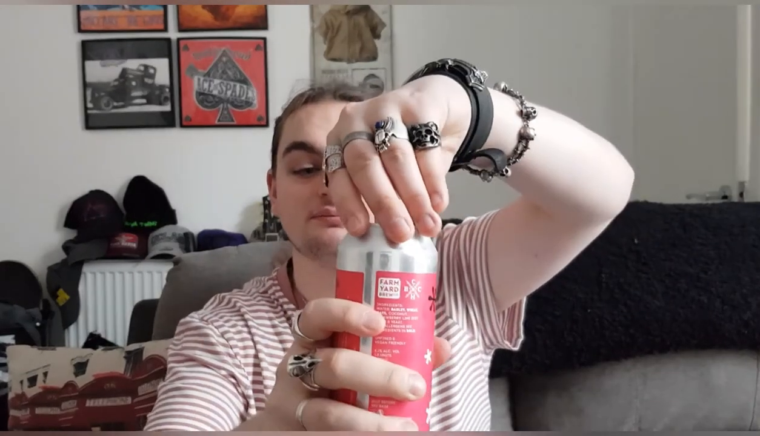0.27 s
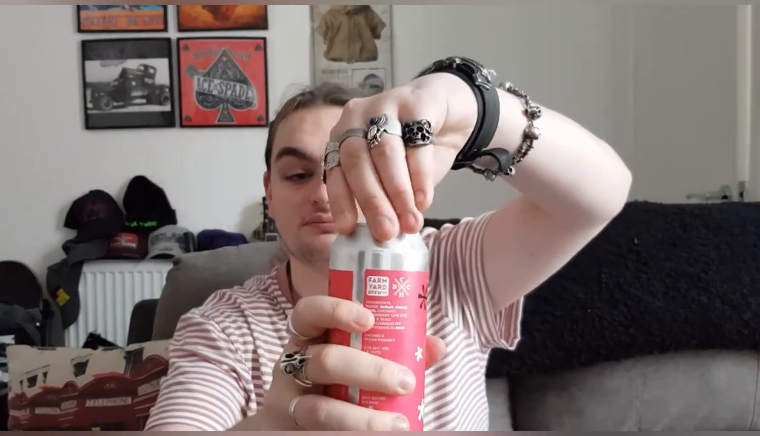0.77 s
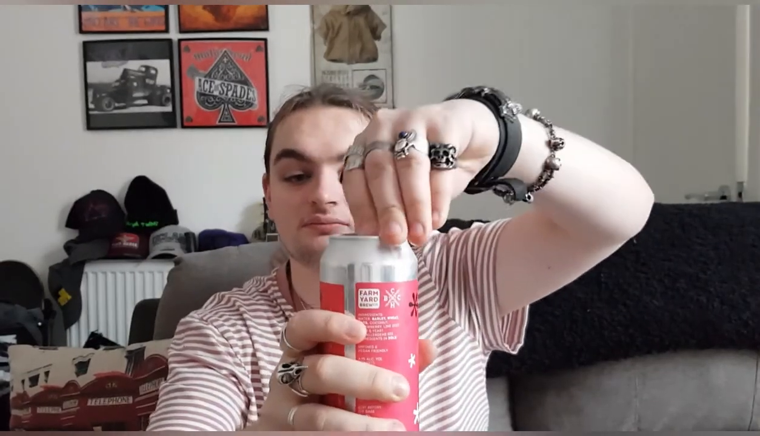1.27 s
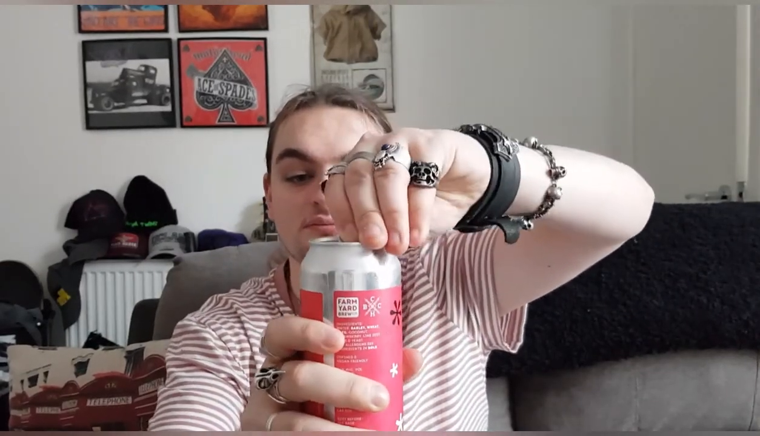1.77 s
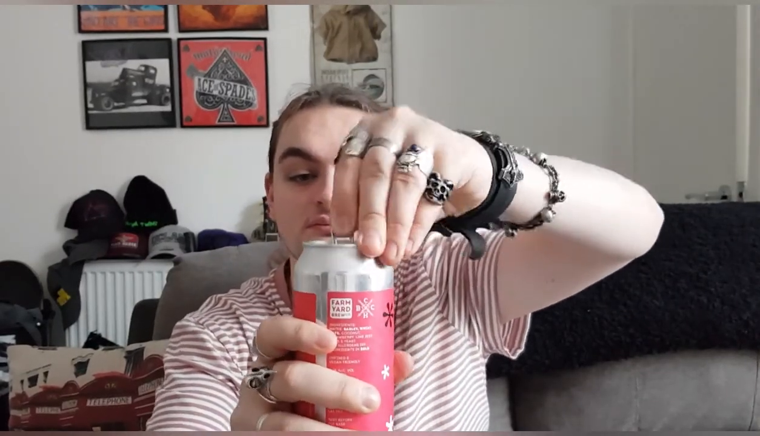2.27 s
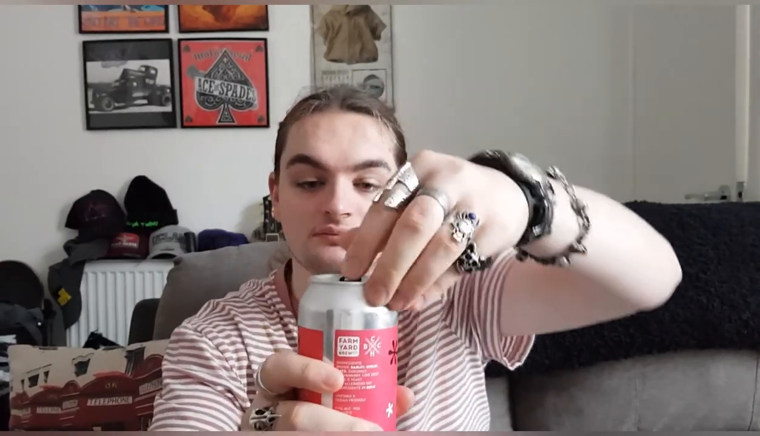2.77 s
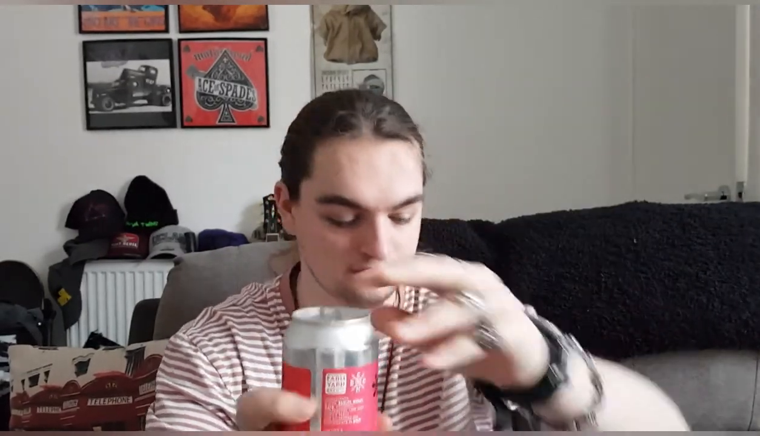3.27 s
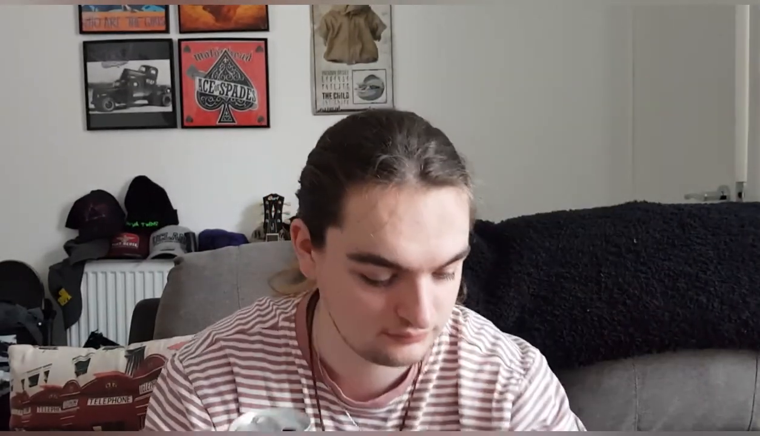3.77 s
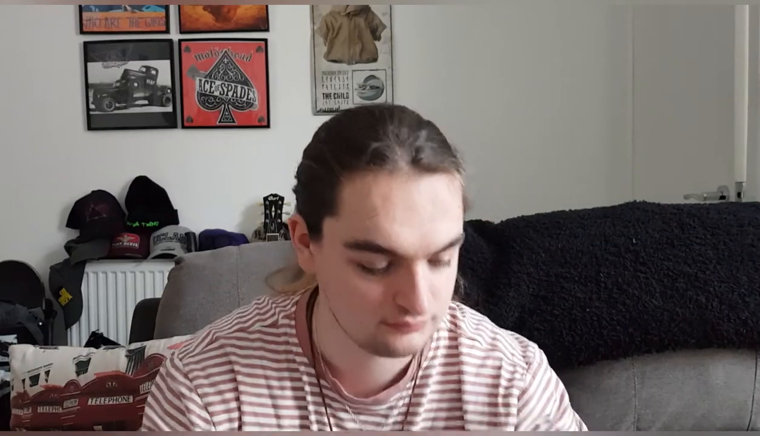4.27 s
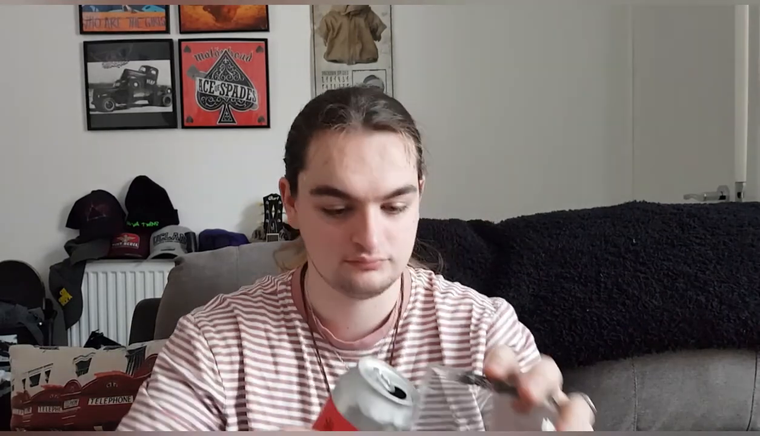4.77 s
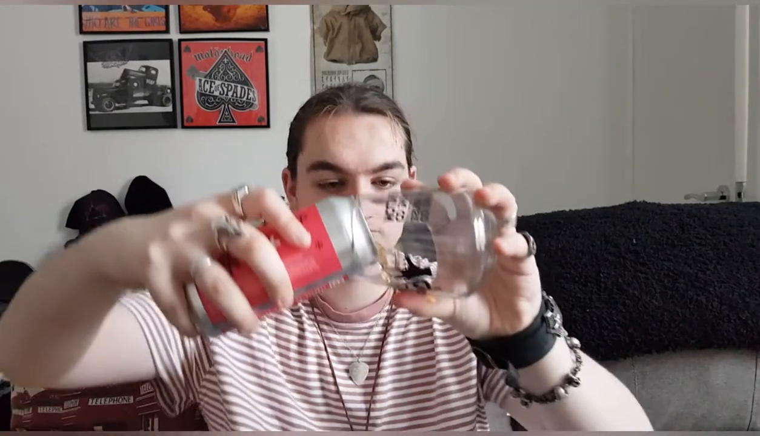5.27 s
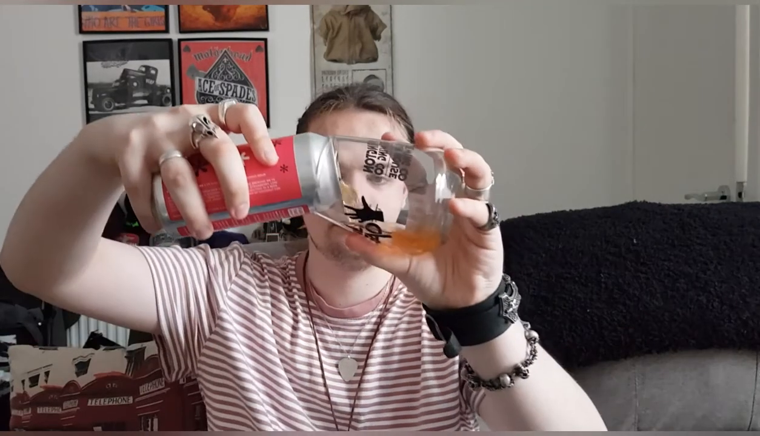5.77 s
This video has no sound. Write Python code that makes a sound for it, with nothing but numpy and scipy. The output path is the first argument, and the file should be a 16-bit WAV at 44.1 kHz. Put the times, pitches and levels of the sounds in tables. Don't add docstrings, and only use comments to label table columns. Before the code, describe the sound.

Close up in a small furnished room, a can seal snaps very loudly with a short puff of gas. Light tab ticks follow, then a rapid metallic tear and pop with a softer hiss. Fingers tick the tab and finger rings chink on metal. After a quieter gap, a can knocks a glass brightly and beer glugs softly. Faint motor hum and clock ticks sit beneath, in phone-style stereo.

```python
import sys
import numpy as np
from scipy import signal
from scipy.fft import rfft, irfft
from scipy.io import wavfile
from scipy.ndimage import uniform_filter1d

SR = 44100
rng = np.random.default_rng(int(sys.argv[2]) if len(sys.argv) > 2 else 0)


def dump(signal):
    limited = np.clip(np.atleast_2d(signal).T, -1, 1)
    pcm = np.round(limited * 32767).astype(np.int16)
    wavfile.write(sys.argv[1], SR, pcm)


def volts_from_decibels(level):
    exponent = np.asarray(level, float) / 20
    return 10 ** exponent


N = 264644
t = np.arange(N) / SR

# freq_hz, level_db (per Hz)
METAL_COLOUR = [(200, -58), (500, -45), (900, -32.5), (1340, -26), (1900, -9), (2600, -6), (3500, 0.5),
                (4400, -2), (5700, 0), (6800, -11), (8600, -19.5), (11100, -12), (15500, -27)]


def unit(x):
    return x / np.sqrt(np.mean(x ** 2))


def decay(u, t60_s):
    return np.exp(-np.log(1000) * u / t60_s)


def on_hz(points, size):
    freq_hz, value = np.transpose(points)
    bins_hz = np.arange(size // 2 + 1) * SR / size
    return np.interp(np.log(bins_hz + 1), np.log(freq_hz), value)


def noise(points, channels=1):
    white = rng.standard_normal((channels, N))
    return unit(irfft(rfft(white) * volts_from_decibels(on_hz(points, size=N)), N))


def walk(rate_hz):
    k = int(SR / rate_hz)
    return unit(uniform_filter1d(uniform_filter1d(rng.standard_normal(N), k), k))


def swells(rows, rise_s, fall_s):
    return sum(volts_from_decibels(db) * np.exp(np.minimum((t - s) / rise_s, (s - t) / fall_s)) for s, db in rows)


def click(points, tilt_db):
    tilt = [(hz, tilt_db * np.log2(hz / 3000)) for hz in (100, 20000)]
    ceps = irfft(np.log(volts_from_decibels(on_hz(points, size=1024) + on_hz(tilt, size=1024))))
    ceps[1:512] *= 2
    ceps[513:] = 0
    h = irfft(np.exp(rfft(ceps)))
    return h / np.abs(h).max()


def burst(seconds):
    b = np.eye(1, 256)[0]
    for share in rng.uniform(.25, 1, 3):
        loop = np.zeros(2 + int(share * seconds * SR))
        loop[[0, -1]] = 1, .55
        b = signal.lfilter(loop[::-1], loop, b)
    return b


def ring(modes, tilt_db=0., rise=3.02, size=SR // 3):
    u = t[:size]
    out = 0
    for hz, db, t60_s in modes:
        level = volts_from_decibels(db + tilt_db * np.log2(hz / 1000))
        push = np.sin(np.pi / 2 * np.minimum(u * hz / rise, 1)) ** 2
        out = out + level * np.sin(2 * np.pi * hz * u) * decay(u, t60_s) * push
    return out


def add(out, s, db, pan_db, sound):
    i = int(s * SR)
    n = min(len(sound), N - i)
    out[:, i:i + n] += volts_from_decibels(db + np.array([[pan_db], [-pan_db]]) / 2) * sound[:n]


def air():
    # freq_hz, level_db (per Hz)
    air_colour = [(150, -35), (250, -15), (323, -13), (450, -11.5), (560, -17.5), (700, -11.5),
                  (800, -17.5), (1150, -19), (1400, -20.5), (3200, -26), (4500, -22), (5800, -28),
                  (7500, -34), (10000, -59.5)]
    # freq_hz, level_db
    air_width = [(250, -7.5), (640, 2.5), (1400, 0.63)]
    mid, side = noise(air_colour, channels=2)
    side = irfft(rfft(side) * volts_from_decibels(on_hz(air_width, size=N)), N)
    return (mid + side * np.array([[1], [-1]])) * volts_from_decibels(-80 + 1.8 * walk(3))


def hum():
    overtones = [2, 3, 4, 5, 6, 7, 8, 9, 12, 14, 15, 16, 24.95]
    overtone_db = [-92.5, -89.5, -83.5, -83, -94.5, -80.5, -91, -89, -86, -84.5, -92.5, -89.5, -87.5]
    phase = 2 * np.pi * np.cumsum(45.6 * (1 + .0015 * walk(2))) / SR
    lull_db = -15 * np.exp(-((t - 3.666) / 0.15) ** 2)
    base_db = -69.5 + 0.12 * (t - t.mean()) + .6 * walk(1.6) + lull_db
    out = volts_from_decibels(base_db + np.array([[6.], [-3.]]) + 1.5 * walk(9)) * np.sin(phase)
    for k, db in zip(overtones, overtone_db):
        offset = rng.uniform(0, 2 * np.pi) + rng.normal(0, 0.8, (2, 1))
        out = out + volts_from_decibels(db + 2 + 1.5 * walk(8.7)) * np.sin(k * phase + offset)
    return out


def clock():
    out = np.zeros((2, N))
    first_s, period_s, lag_s, step_db = .26, 1.0, .022, -78
    u = t[:4000]
    step = noise([(2500, -1.5), (3500, -6), (4500, 3), (5200, 3.0), (6300, -3.5), (7500, -55)])[0]
    land = noise([(800, -44), (1300, 12.0), (1900, -5.0), (2500, -31.0), (3500, -9.5), (5000, -27.5)])[0]
    for k, s in enumerate(first_s + period_s * np.arange(6)):
        part = slice(k * len(u), (k + 1) * len(u))
        add(out, s, step_db, 0, step[part] * (u / .025) * np.exp(1 - u / .025))
        add(out, s + lag_s, step_db + 10, 0, land[part] * np.exp(-u / 0.004))
    return out


def rumble():
    mid, side = noise([(45, -30.0), (70, 2.5), (110, -4.5), (160, -6), (230, -6.0), (300, -17.0),
                       (500, -48), (1000, -95.5)], channels=2)
    return (mid + 0.34 * side * np.array([[1], [-1]])) * volts_from_decibels(0.83 * walk(20))


def sofa():
    # peak_s, level_db
    shifts = [(.3, -78), (2.6, -78), (3.25, -81.5), (4.05, -76.5), (4.85, -71)]
    return rumble() * (volts_from_decibels(-83 + 5.5 * walk(3)) + swells(shifts, rise_s=.2, fall_s=.2))


def thumps():
    # start_s, level_db
    jolts = [
        (.6, -65.5),
        (1.914, -57.5),
        (4.844, -56),
    ]
    out = np.zeros((2, N))
    for s, db in jolts:
        add(out, s, db, 0, ring([(90, -0.5, .15), (135, -2, 0.25), (227, -1, 0.12)], rise=0.88))
    return out


def pouring():
    # peak_s, level_db
    lurches = [(5.18, -67), (5.33, -78), (5.41, -64.5), (5.53, -63.5), (5.685, -54.5), (5.74, -60),
               (5.845, -68.5), (5.916, -57.5), (5.97, -63)]
    # peak_s, level_db
    gulps = [(5.18, -69), (5.41, -71), (5.46, -74), (5.55, -73), (5.702, -54.5), (5.787, -74), (5.842, -62),
             (5.892, -64), (5.948, -65)]
    glug = noise([(200, -61.5), (320, 2.5), (355, -17.5), (405, 3.5), (460, -16), (900, -77.5)])
    slosh = rumble() * swells(lurches, rise_s=0.016, fall_s=0.044)
    return slosh + glug * swells(gulps, rise_s=0.015, fall_s=0.031)


def glass():
    # start_s, peak_db, hardness_db (per octave), thud_db, shell_db
    knocks = [
        (3.858, -68.5, 12, -1, 10),
        (4.831, -22.5, -1.56, -1.5, 0.5),
        (4.8448, -36, 4, 2, 13),
        (4.8635, -25, 2, 10, 0.5),
        (4.8757, -40.5, -17, 11, -20.5),
    ]
    # pitch_hz, level_db, t60_s
    glass_modes = [(1450, -2, 0.035), (2190, -2, 0.0424), (2800, 5.5, 0.11), (3030, 3, 0.031),
                   (3500, -15, 0.053), (5120, 0.5, 0.06), (5350, -14, 0.022), (7430, -12.5, 0.038),
                   (9620, -8.5, 0.018), (13200, -15, 0.023)]
    # pitch_hz, level_db, t60_s
    can_wall = [(474, -4, 0.17), (510.4, -4.5, 0.14), (527, 2, 0.05), (1128, 1.5, 0.037)]
    # freq_hz, level_db (per Hz)
    thud_colour = [(150, -28), (300, 1), (490, -2), (1000, 3), (1600, 8), (2800, 3), (3900, 0.5),
                   (5100, -15), (6200, -3.5), (8500, -20), (11500, -7.5), (15500, -14)]
    # peak_s, level_db
    drags = [(4.678, -66), (4.727, -67)]
    out = np.zeros((2, N))
    for s, db, hard_db, thud_db, shell_db in knocks:
        modes = [(hz * rng.normal(1, .004), v, t60) for hz, v, t60 in glass_modes]
        twins = [(hz * rng.normal(1, 0.016), v, t60 / 2) for hz, v, t60 in glass_modes]
        sound = 0.096 * ring(modes, hard_db) + 0.22 * volts_from_decibels(1) * ring(twins, hard_db)
        sound += 0.36 * volts_from_decibels(shell_db) * ring(can_wall)
        thud = np.convolve(click(thud_colour, -2.5), burst(.0008))
        sound[:len(thud)] += volts_from_decibels(thud_db) * thud
        add(out, s, db, -0.5, sound)
    grit = noise([(250, -24.5), (600, 1), (1100, -6.5), (2200, -18.5), (3500, -26.5), (6500, -20), (8000, -31)])
    return out + grit * volts_from_decibels(2 * walk(80)) * swells(drags, rise_s=0.0117, fall_s=0.045)


def tick(out, s, db, pan_db, modes, crack_db):
    lid = [(1500 * 5.0 ** a, -5.5 - 12 * b - 4 * a, 0.0083) for a, b in rng.random((24, 2))]
    crack = ring(lid, size=4096)
    crack[:1024] += click(METAL_COLOUR, -.8)
    crowd = []
    for hz, v, t60 in modes:
        for a, b in rng.random((3, 2)):
            crowd.append((hz * (1 + 0.052 * (a - .5)), v - 5 * b - 5, t60))
    add(out, s, db, pan_db, ring(crowd, size=4096) + volts_from_decibels(crack_db) * crack)


def finger_rings():
    # start_s, peak_db, pan_db (left minus right), pitch_hz, t60_s
    chinks = [(1, -57, -5, 3280, 0.018), (1, -60, 8, 6060, .012), (1.4632, -29, 5, 4760, 0.0064),
              (1.4635, -41, 0.5, 1060, 0.0064), (2.242, -59, 5, 6600, 0.011),
              (2.241, -49, 1.5, 3750, 0.021), (2.901, -45, 5, 6200, 0.021), (2.901, -50, 3, 7240, .015),
              (2.286, -63, 2, 5350, 0.025), (2.344, -54, 0, 1670, 0.027), (2.346, -59, 8, 5350, .04),
              (3.088, -28, -3, 1106, 0.0072), (3.195, -54.5, -3.5, 1966, .011),
              (3.70, -64.5, -5.5, 3500, 0.0089), (3.858, -48, 4, 5270, .03), (3.862, -45, -8, 5170, 0.031),
              (3.886, -49, 0, 5350, 0.012), (3.946, -56.5, 0, 5720, 0.0051),
              (5.683, -59.5, -1, 2000, 0.038), (5.684, -56, 0, 3100, 0.017), (5.685, -58.5, 0, 3620, 0.039),
              (5.682, -55.5, 0, 4600, 0.0087), (5.855, -61, 7, 6760, 0.007), (5.881, -66, -1, 3020, 0.018)]
    out = np.zeros((2, N))
    for s, db, pan_db, hz, t60 in chinks:
        tick(out, s, db, pan_db, [(hz, 0, t60)], crack_db=-11)
    return out


def tab_taps():
    # start_s, peak_db, pan_db (left minus right), pitch_hz (lowest ring), crack_db (over the ring)
    taps = [(0.845, -59.5, -1, 1310, -16), (.913, -57.5, 5, 1337, -3), (2.241, -59, 0, 1000, -15),
            (2.327, -54.5, 0, 990, -23), (2.3432, -46, 2.1, 1004, -3), (2.449, -56.5, 2, 1010, -3),
            (2.6145, -28, 2, 1086, -25), (2.697, -51.5, -8.5, 1020, -13.5), (2.895, -57.5, 1.1, 1204, 4),
            (2.901, -37.5, 2.5, 1112, 6), (3.46, -64.5, 0.4, 1143, -19.5), (3.729, -62.5, -1.5, 1110, -20),
            (3.856, -49.5, -6, 1137, -35), (3.946, -65.5, -1.5, 1250, 14.5)]
    # multiple of the lowest ring, level_db, t60_s
    tab_modes = [(1, 2, .024), (1.45, -8.5, .008), (1.8, -10, .016), (2.549, -15.5, 0.048),
                 (4.6, -38, 0.013), (5.45, -26, 0.024)]
    out = np.zeros((2, N))
    for s, db, pan_db, hz, crack_db in taps:
        bright_db = 0.29 * crack_db
        modes = [(k * hz, v + bright_db * np.log2(k), t60) for k, v, t60 in tab_modes]
        tick(out, s, db, pan_db, modes, crack_db)
    return out


def gas():
    out = np.zeros((2, N))
    hiss = noise(METAL_COLOUR)[0] * volts_from_decibels(walk(60))
    for s, db in [(.5985, -33.5), (1.9185, -40.5)]:
        add(out, s, db, 0, hiss[:SR] * decay(t[:SR], 0.42))
    return out


def seal():
    # start_s, peak_db, pan_db (left minus right), tilt_db (per octave), treble_db
    snaps = [(0.5973, -1.5, -3, -2.5, 2.5), (0.6058, -3, 0, 19, 16), (.934, -45.5, -2, 4, -9),
             (1.4635, -27, -0.5, 0.5, -20), (1.8752, -52.5, -4, 0, -34), (1.907, -6.5, 7, 5.5, -6),
             (2.241, -41.5, 4, 16, -10), (2.4485, -44, 1, 17, -11), (2.9012, -40, -8, 0, 0),
             (3.088, -30.5, 2, -8, 13), (4.673, -55.5, -5.5, 0, 2.5), (1.9168, -6, 5, 6.5, -6)]
    # start_s, peak_db, pan_db (left minus right)
    tears = [(1.8876, -24.5, -0.5), (1.8896, -22, 2.4), (1.8938, -22.5, 5), (1.9005, -19, -7.5),
             (1.9032, -22.5, -4), (1.9117, -19.5, -2.5), (1.916, -37, 4)]
    # pitch_hz, level_db, t60_s
    pop_modes = [(650, -19, 0.0022), (840, -3.5, 0.011), (861, -1.5, .04), (1000, -3.5, 0.013),
                 (1250, -2, 0.01), (1454, -11, 0.018), (3700, -17.5, 0.032), (3420, -16, 0.17),
                 (3930, -12.5, 0.1), (4340, -20.5, 0.22), (3760, 0.5, .012), (4100, -4.5, .02),
                 (5800, 1.5, .005)]
    out = np.zeros((2, N))
    events = [(*row, .14) for row in snaps]
    events += [(*row, 4, -5, 0.85) for row in tears]
    for s, db, pan_db, tilt_db, treble_db, ms in events:
        colour = [(hz, v + treble_db * (hz > 7000)) for hz, v in METAL_COLOUR]
        add(out, s, db, pan_db, np.convolve(click(colour, tilt_db), burst(ms / 1000)))
    no_bass = signal.butter(4, 540, "high", fs=SR, output="sos")
    add(out, snaps[-1][0], -15, 0, signal.sosfilt(no_bass, ring(pop_modes, rise=0.44)))
    return out


def room(x):
    # freq_hz, t60_s, left-right likeness (0-1)
    bands = [(125, 0.19, 1), (280, .2, 0.82), (490, 0.3, 0.2), (1000, 0.29, 0.8), (2000, 0.3, 0.4),
             (4070, 0.31, 0), (7550, 0.3, 0.67), (14000, 0.28, 0.3)]
    # delay_s, left_db, right_db
    echoes = [(.0052, -4, -6), (.0072, -11, -10), (.0095, -8, -8), (.013, -11, -11), (.021, -11, -11)]
    u = t[:SR // 2]
    shared, *own = rfft(rng.standard_normal((3, len(u))))
    tail = 0
    for k, (hz, t60, like) in enumerate(bands):
        like = np.clip(like, 0, 1)
        band = on_hz([(row[0], float(j == k)) for j, row in enumerate(bands)], size=len(u))
        both = np.sqrt(like) * shared + np.sqrt(1 - like) * np.array(own)
        tail = tail + irfft(both * band, len(u)) * decay(u, t60)
    tail = tail * np.clip((u - .004) / 0.0046, 0, 1)
    h = volts_from_decibels(3) * tail / np.sqrt(np.sum(tail ** 2, axis=1, keepdims=True))
    for s, *sides_db in echoes:
        i = int(s * SR)
        for side, db in enumerate(sides_db):
            h[side, i:i + 256] += volts_from_decibels(db) * burst(.0007)
    return signal.fftconvolve(x.mean(axis=0, keepdims=True), h, axes=1)[:, :N]


def scene():
    near = glass() + finger_rings() + tab_taps() + gas() + seal()
    direct = np.array([np.roll(near[0], 1), near[1]])
    background = air() + hum() + sofa() + thumps()
    return background + pouring() + direct + room(near + clock())


def band_limit(x):
    return signal.sosfilt(signal.butter(12, 16790, fs=SR, output="sos"), x)


def record(dry):
    # freq_hz, level_db (per Hz)
    hiss_colour = [(4000, -31), (8000, -20), (10000, -6.5), (12000, 3), (14000, 1), (16000, 1.5)]
    hissy = dry + volts_from_decibels(-72) * noise(hiss_colour)
    soft = 1.7 * np.tanh(hissy / 1.7)
    top = signal.ellip(8, .2, 70, 15900, fs=SR, output="sos")
    return band_limit(signal.sosfilt(top, soft))


dry = scene()
out = record(dry)
dump(out)
```